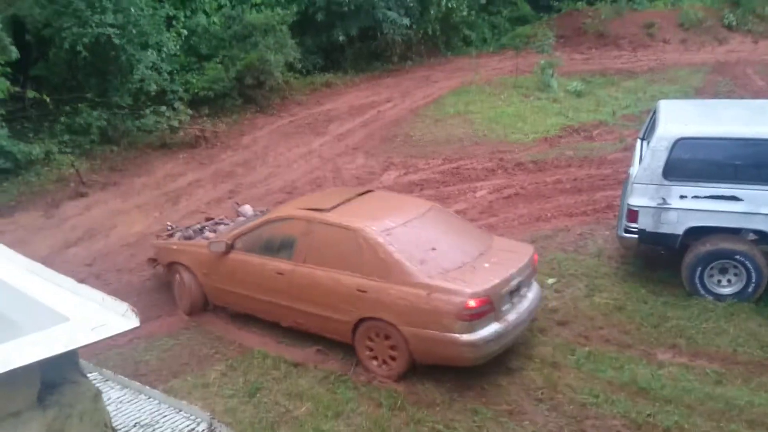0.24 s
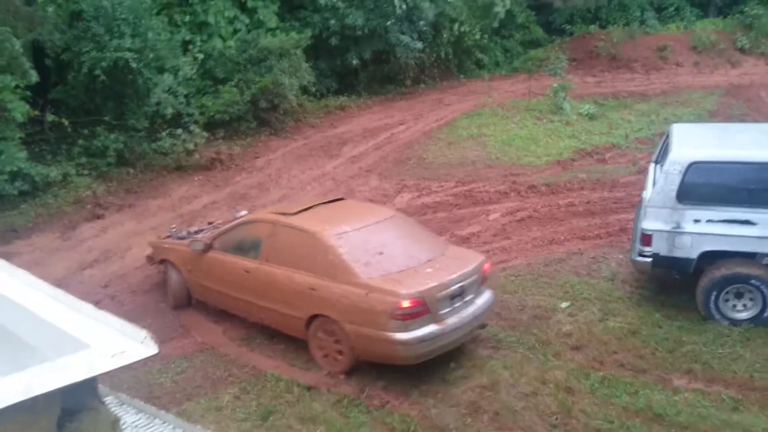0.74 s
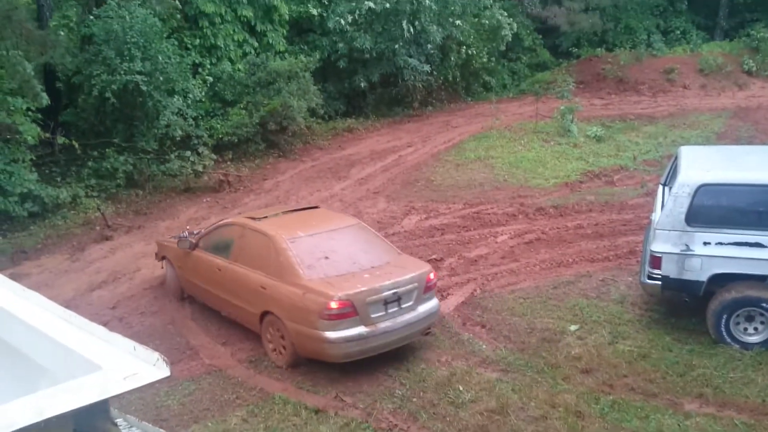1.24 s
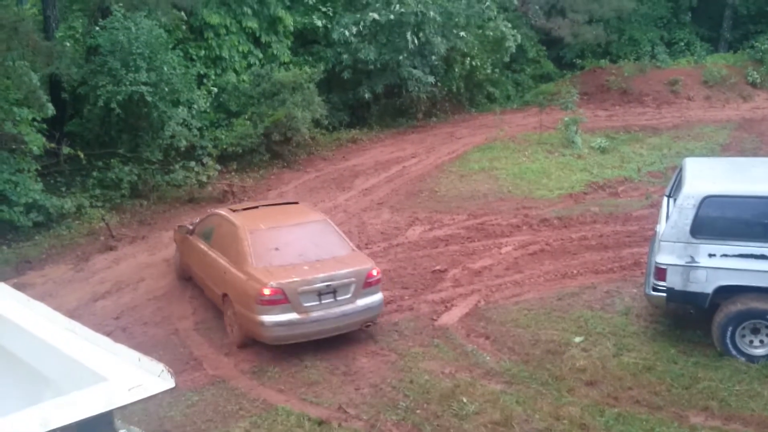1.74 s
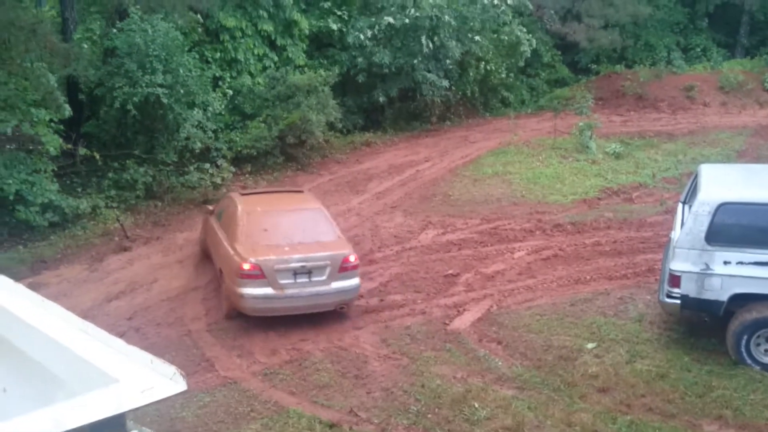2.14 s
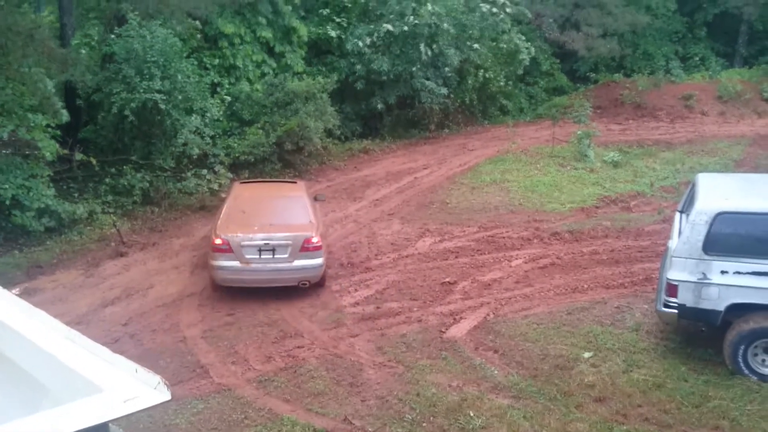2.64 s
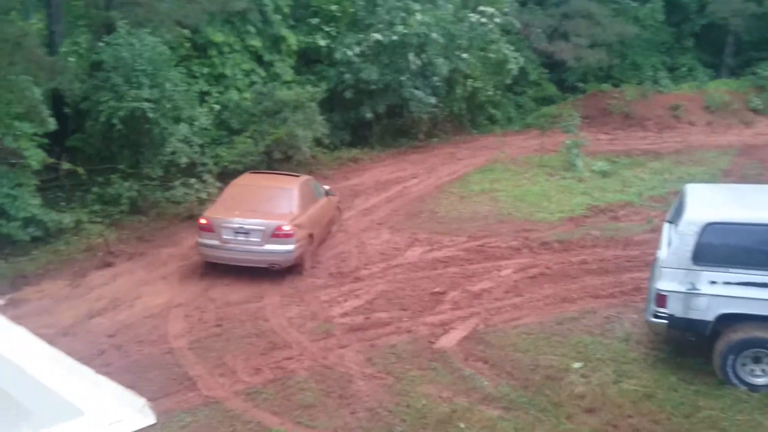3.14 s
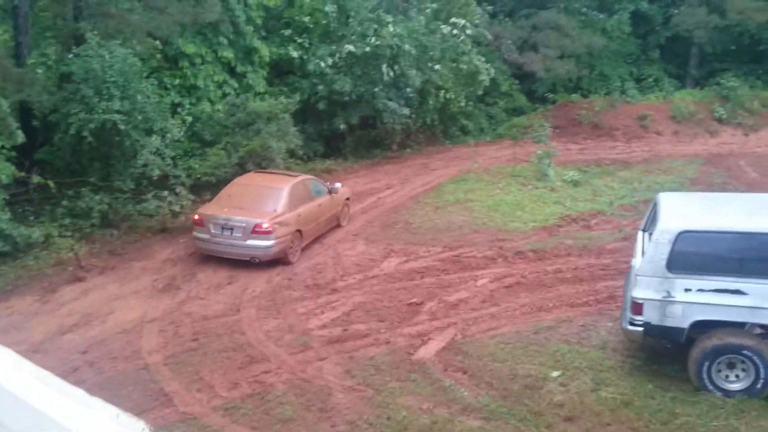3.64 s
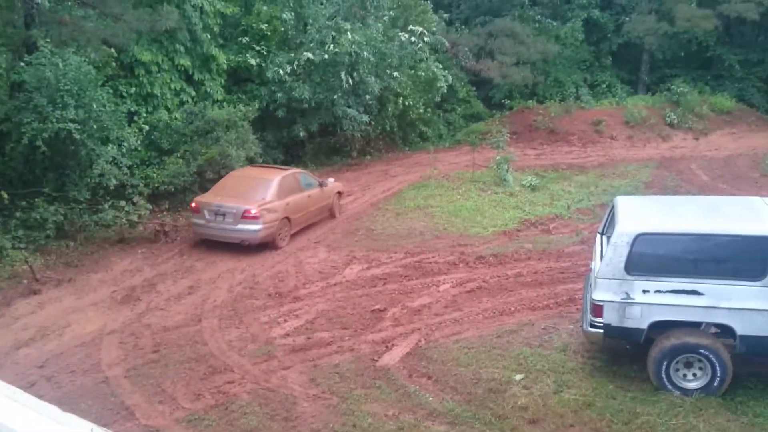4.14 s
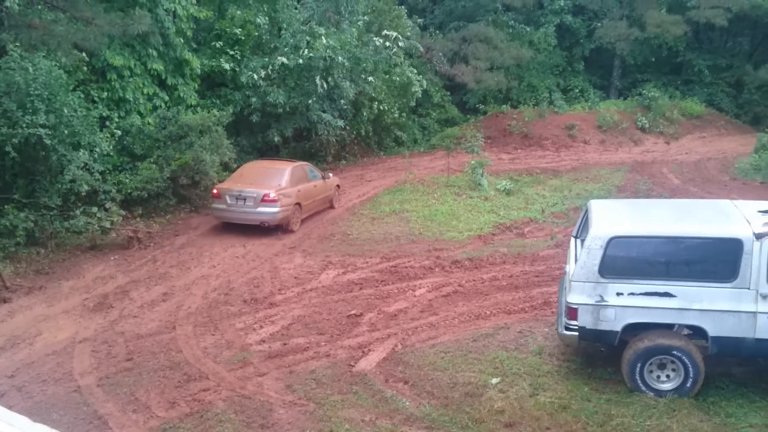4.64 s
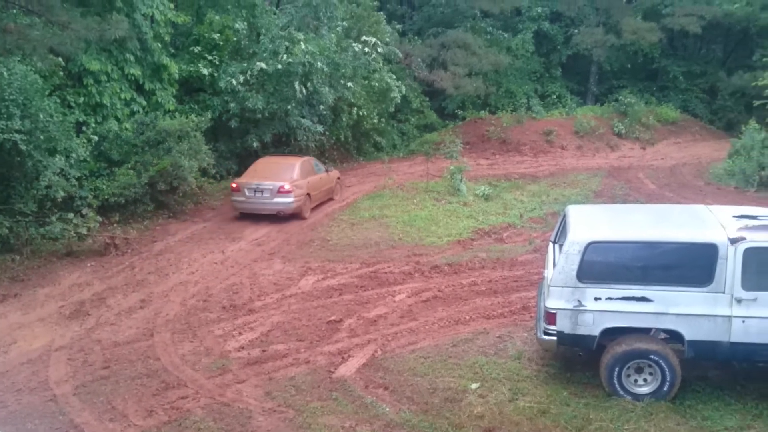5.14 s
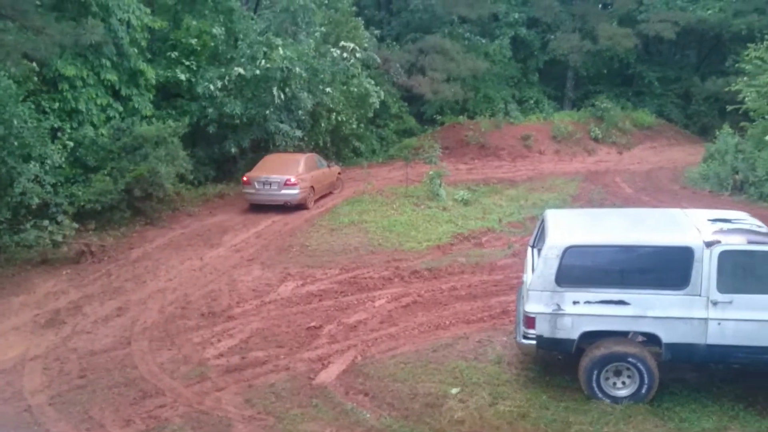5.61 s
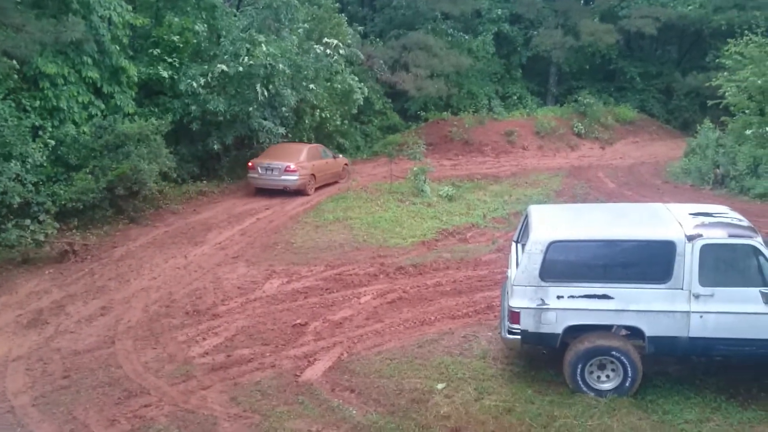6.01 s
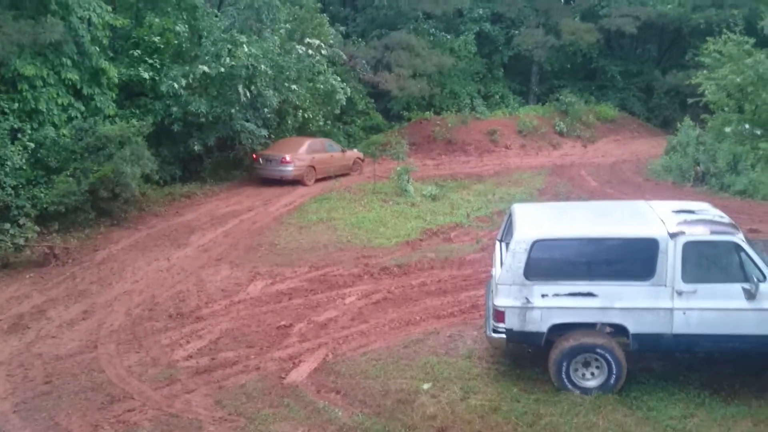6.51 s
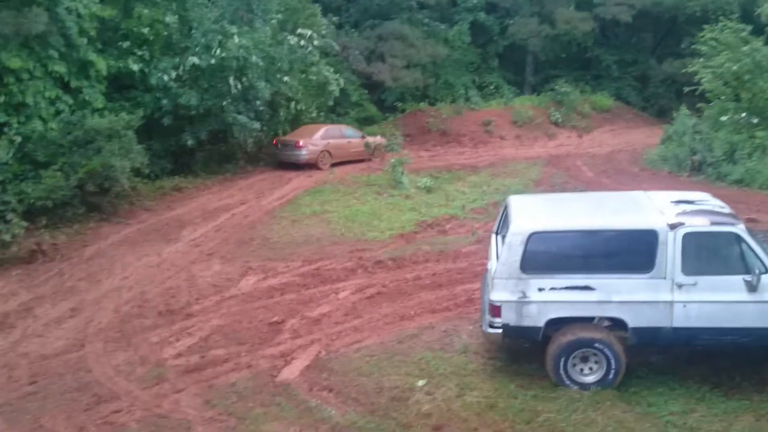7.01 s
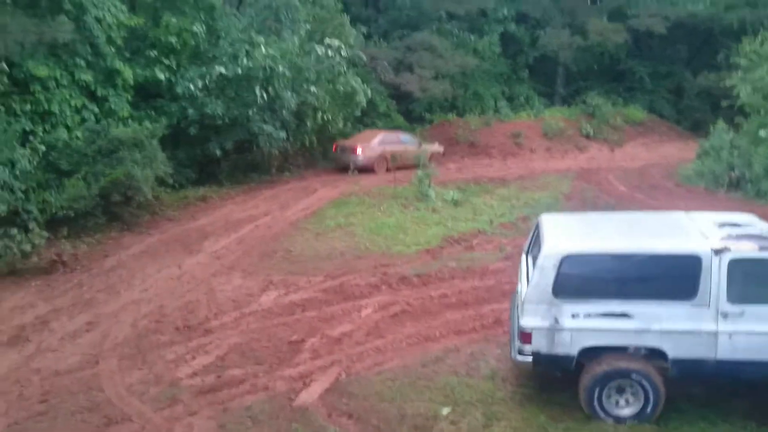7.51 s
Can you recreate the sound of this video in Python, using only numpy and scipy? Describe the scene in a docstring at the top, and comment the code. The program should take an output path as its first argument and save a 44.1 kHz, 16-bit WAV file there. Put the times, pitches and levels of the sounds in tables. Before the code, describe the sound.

Wet spray hisses and mud splatters from slipping tyres while a car engine drones low and fades into the distance.

```python
"""A car pulls away through deep wet mud

Heard from a porch above, spinning front tyres whistle, churn slush and fling hissing spray, and gobs
of mud slap the wheel wells. A four-cylinder engine drones beneath, with a whining pulley and a humming
fan. After two seconds the car turns its tail to the listener and recedes. At the far bend its driveline
(the parts that turn the wheels) sings and runs down, and a hand softly knocks the microphone."""
import sys
import numpy as np
from scipy import signal
from scipy.fft import rfft, irfft, next_fast_len
from scipy.io import wavfile
from scipy.ndimage import uniform_filter1d, map_coordinates

SR = 44100
rng = np.random.default_rng(int(sys.argv[2]) if len(sys.argv) > 2 else 0)


def wrap_up_sound(samples):
    """Save the sound to the file named by the first command line argument, as 16-bit audio."""
    columns = np.atleast_2d(samples).T
    # keep every value between -1 and 1, then stretch to whole-number steps
    tamed = np.clip(columns, -1, 1)
    steps = np.round(tamed * 32767).astype(np.int16)
    wavfile.write(sys.argv[1], SR, steps)


N = 342417
T = np.arange(N) / SR
FFT_SIZE = next_fast_len(N + 8192)
HZ = np.fft.rfftfreq(FFT_SIZE, 1 / SR)

START_M, SPEED_M_PER_S = 11.4, 6.4  # how far off the car starts and how fast it drives
TURN_S, TURN_LENGTH_S = 2.18, 0.74  # middle and length of the turn that shows its tail
BEND_S, BEND_LENGTH_S = 7.31, 0.47  # the same for the far bend
SING_S, SING_ATTACK_S = 5.9, 0.3  # when the driveline starts to sing and how long it takes to swell


def amp(db):
    """Turn decibels into a gain to multiply by."""
    return 10 ** (np.asarray(db) / 20)


def unit(x):
    """Scale a signal to an average (rms) level of 1."""
    return x / np.sqrt(np.mean(x ** 2) + 1e-20)


def over_frequency(rows):
    """Spread each column after the frequency into a curve on the HZ grid, along a log axis."""
    hz, *columns = np.transpose(rows)
    return [np.interp(np.log(HZ + 1), np.log(hz + 1), column) for column in columns]


def over_time(rows):
    """Spread each column after the time into one value per sample."""
    times, *columns = np.transpose(rows)
    return [np.interp(T, times, column) for column in columns]


def wobble(rate):
    """A smooth random curve that passes through `rate` random values a second."""
    coarse = T[::32]
    values = rng.standard_normal(int(N * rate / SR) + 4)
    return np.interp(T, coarse, map_coordinates(values, [coarse * rate]))


def angle(hz):
    """The running phase of a changing pitch, in radians."""
    return 2 * np.pi * np.cumsum(hz) / SR


def ramp(middle, length):
    """A smooth change from 0 to 1."""
    return .5 + .5 * np.sin(np.pi * np.clip((T - middle) / length, -.5, .5))


def hump(middle, half_length):
    """A smooth rise to 1 and back."""
    return np.exp(-((T - middle) / half_length) ** 2)


def swell(start, length):
    """The outline of a burst that rises quickly and drains off."""
    outline = np.zeros(N)
    live = (T > start) & (T < start + 5 * length)
    age = (T[live] - start) / (.45 * length)  # 1 at the peak
    outline[live] = (age * np.exp(1 - age)) ** 2
    return outline


def filtered(x, response):
    """Apply one gain per frequency of the HZ grid."""
    return irfft(rfft(x, FFT_SIZE) * response, FFT_SIZE)[..., :N]


def shaped_noise(colour):
    """Noise of level 1 whose tone follows rows of (frequency [Hz], level [dB])."""
    return unit(filtered(rng.standard_normal(N), amp(over_frequency(colour)[0])))


def stereo_spectrum(direct, scattered, ports):
    """Direct sound differs in level and phase at two microphone ports; trees add unrelated scatter."""
    balance_db, lead, likeness = over_frequency(ports)
    likeness = np.clip(likeness, 0, .995)
    sides = np.array([[.5], [-.5]])
    straight = rfft(direct, FFT_SIZE) * np.sqrt(likeness) * np.exp(1j * sides * lead)
    scatter = rfft(scattered, FFT_SIZE) * np.sqrt(1 - likeness)
    return (straight + scatter) * amp(sides * balance_db)


def distance():
    """Metres to the car, which sets off across the view and then heads more and more away."""
    return np.hypot(START_M, SPEED_M_PER_S * T)


def distance_db():
    """Sound thins out as it spreads: the level change since the start."""
    return 20 * np.log10(START_M / distance())


def shade_db():
    """The car's body blocks sound from its front as the nose swings away; the bend blocks a bit more."""
    return -6.5 * ramp(1, 0.46) - 0.5 * ramp(BEND_S, BEND_LENGTH_S)


def spin_db():
    """How hard the wheels spin, in dB above or below a typical spin."""
    # wheelspin, told by the spray it throws: (time [s], level [dB])
    wheelspin = [(0.0, -44), (0.24, -36.5), (0.76, -35.5), (1.03, -37), (1.2, -36), (2.02, -38.5),
                 (2.12, -42.5), (2.32, -44.5), (2.98, -38.5), (3.22, -33.5), (4.19, -37), (4.75, -37.5),
                 (5.25, -33), (5.68, -36), (6.61, -44), (7.09, -40.5), (7.52, -50), (7.76, -54)]
    typical_db = -36
    return over_time(wheelspin)[0] - typical_db


def engine():
    """Slightly uneven firing makes a drone with overtones; a belt-driven pulley whines and a fan hums."""
    # the firing tone, set by the driver's foot: (time [s], firing rate [Hz], level [dB])
    firing = [(0, 63.5, -33), (0.4, 77.36, -27.5), (0.72, 83.8, -29), (0.88, 86.3, -40), (1.11, 84.4, -38),
              (1.26, 73.2, -31), (1.5, 71.7, -36.5), (2.02, 76.2, -38), (2.4, 70.2, -37), (2.77, 65.7, -40),
              (3.1, 67.3, -37), (3.55, 71, -33.5), (3.95, 73.45, -39), (4.3, 74.9, -33.5), (4.7, 81.6, -42),
              (5.1, 88.5, -31), (5.5, 84.9, -32), (5.95, 73.55, -43.5), (6.55, 65.7, -43.5), (7, 66, -47),
              (7.4, 52.2, -60)]
    # further engine tones: (multiple of the firing rate [x], level against the unfaded octave [dB])
    overtones = [(.5, -14), (1.5, -13), (3, -10), (3.5, -26), (4, -13), (5, -29), (6, -13.5)]
    firing_hz, firing_db = over_time(firing)
    away, shade = ramp(TURN_S, TURN_LENGTH_S), shade_db()
    overtone_db = -41 + 0.87 * distance_db() + 0.29 * (firing_db - firing_db.mean())
    overtone_db -= 6 * hump(.95, .17)  # the overtones dip briefly near one second
    overtone_db -= 6 * ramp(BEND_S, BEND_LENGTH_S)  # the revs drop
    # the second and third harmonics fade while the second is near 181 Hz
    faded_db = overtone_db - 17 / (1 + ((2 * firing_hz - 181) / 6.1) ** 4)

    phase = angle(firing_hz * (1 + 0.003 * wobble(25)))
    drone = amp(firing_db + .9 * wobble(7) + 1.1 * wobble(28)) * np.sin(phase + .15 * wobble(30))
    octave = np.sin(2 * phase + (.15 + .6 * away) * wobble(36))  # sputters more after the turn
    drone += amp(faded_db + 1.4 * wobble(9) + 1.1 * wobble(32)) * octave
    drone += amp(faded_db - 9 + wobble(9)) * away * np.sin(3 * phase)  # the tailpipe faces the porch
    for multiple, db in overtones:
        gain = amp(overtone_db + db + shade + 4.3 * wobble(23))
        drone += gain * np.sin(multiple * phase + wobble(27))
    return np.sqrt(2) * (drone + pulley(firing_hz, phase) + fan())


def pulley(firing_hz, firing_phase):
    """The belt ties the pulley to the engine, so its whine gets higher and louder with the revs."""
    level_db = -50 + 0.89 * shade_db() + 0.27 * (firing_hz - firing_hz.mean())
    level_db += 3 * ramp(TURN_S, TURN_LENGTH_S)  # carries better once the car has turned
    level_db -= 6 * ramp(SING_S, SING_ATTACK_S)  # the revs drop
    return amp(level_db + 3 * wobble(16)) * np.sin(9.03 * firing_phase + .45 * wobble(45))


def fan(pitch_hz=259):
    """The electric fan's blades hum at a nearly steady pitch, with a faint octave above."""
    phase = angle(pitch_hz + 0.68 * wobble(5.38))
    level_db = -43 + shade_db() + 0.99 * distance_db() + 1.6 * wobble(12)
    return amp(level_db) * (np.sin(phase) + amp(-15) * np.sin(2 * phase))


def fuzzy_tone(hz, width_hz):
    """Rubbing makes things ring unevenly: a narrow band of noise around one pitch."""
    phase = angle(hz + np.zeros(N))
    return wobble(width_hz) * np.sin(phase) + wobble(width_hz) * np.cos(phase)


def tyre_whistle():
    """The slipping tyre rings at two close pitches, which sink and fade as it finds grip."""
    # the lower of the two tones: (time [s], pitch [Hz], level [dB])
    whistle = [(0, 2120, -50), (.2, 2090, -42), (.65, 2040, -44), (.95, 1950, -34.5), (1.2, 1940, -41),
               (1.45, 1910, -48), (1.7, 1900, -80)]
    hz, db = over_time(whistle)
    upper = amp(-5) * fuzzy_tone(1.06 * hz, width_hz=90)
    return amp(db) * (fuzzy_tone(hz, width_hz=90) + upper)


def rumble():
    """Tyres ploughing the ruts and swirling exhaust gas make a low, restless noise."""
    # tone of the rumble: (frequency [Hz], level [dB])
    colour = [(20, -21), (42, -15), (110, -4.5), (220, -1), (380, -6.5), (520, -11), (900, -28)]
    level_db = -45 + 0.42 * distance_db() + 0.44 * spin_db() + 0.12 * shade_db()
    return shaped_noise(colour) * amp(level_db + 3.5 * wobble(22))


def droplets(per_second, spread_db, wash):
    """Countless impacts of very unequal size on a wash of finer ones, in three unrelated streams."""
    hits = (rng.random((3, N)) < per_second / SR) * rng.choice([-1, 1], (3, N))
    size = amp(spread_db * np.minimum(rng.exponential(size=(3, N)), 3.8))
    return unit(hits * size) + wash * rng.standard_normal((3, N))


def resonate(x, peaks, tuning, ripple_db):
    """Resonances slide as the car moves and grow with wheelspin; ground and wall echoes add a ripple."""
    hz, times, spectrum = signal.stft(x, SR, nperseg=1024)
    untuned_hz = hz[:, None] / np.interp(times, T, tuning)
    strength = np.maximum(1 + 0.096 * np.interp(times, T, spin_db()), 0)
    peaks_db = sum(db / (1 + ((untuned_hz - centre) / (width / 2)) ** 4) for centre, width, db in peaks)
    ripple = rng.standard_normal(spectrum.shape[1:])
    for _ in range(2):  # smooth over frequency, then over time
        ripple = uniform_filter1d(ripple, size=4, axis=0)
        ripple = uniform_filter1d(ripple, size=12, axis=1)
    gain = amp(peaks_db * strength + ripple_db * unit(ripple))
    return signal.istft(spectrum * gain, SR, nperseg=1024)[1][:, :N]


def mud_bands(colour, ports, peaks, tuning):
    """Flying mud from one direction as four equally strong stereo bands: churn, slush, spray, mist."""
    drops = droplets(per_second=2600, spread_db=3.5, wash=1.4)
    drops = resonate(drops, peaks, tuning, ripple_db=1.8)
    spectrum = stereo_spectrum(drops[0], drops[1:], ports) * amp(over_frequency(colour)[0])
    below_edges = [1 / (1 + (HZ / edge_hz) ** 12) for edge_hz in (1250, 3000, 8000)]
    between_edges = np.diff(below_edges, axis=0, prepend=0, append=1)
    bands = [irfft(spectrum * response, FFT_SIZE)[:, :N] for response in between_edges]
    return np.array([band / (np.std(band.mean(0)) + 1e-12) for band in bands])


def mud():
    """Spinning wheels throw mud in uneven clumps; its tone changes as the car turns away."""
    # tone of the mud, with the car side-on and driving away: (frequency [Hz], level [dB])
    colour_side = [(150, -40), (330, -26), (480, -12), (720, -10), (1150, -5.5), (1700, 6.5), (2050, 6.5),
                   (2900, -2.5), (4200, -13), (5600, -7), (6400, -1), (8300, -9), (11500, -10),
                   (14200, -18.5), (15400, -9.5)]
    colour_away = [(150, -44), (330, -30), (480, -12.5), (760, -5), (1080, -3.5), (1450, 1), (1800, 1.5),
                   (2200, 2), (2950, -7), (3550, -5), (4400, -10.5), (5600, -6), (6500, -2.5), (7400, -9),
                   (10000, -11.5), (13500, -22), (15400, -16.5)]
    # how those two directions reach the microphone ports:
    # (frequency [Hz], left over right [dB], left lead [radians], likeness of the sides [0-1])
    ports_side = [(100, -4.5, 4.3, 1), (724, -3, 2.98, 0.98), (1220, -6.6, 3, 0.65), (2070, -4, 5.1, 0.06),
                  (3000, 0.5, 7.7, 0.6), (3280, -1.5, 2.9, 0.33), (4200, -6.5, 5.9, 0.02),
                  (5550, -9.5, 8.4, 0.77), (6170, 0, 8.5, 0.84), (7650, 11.5, 9.6, 0.3),
                  (8700, -10, 16.4, 0.8), (8900, -2.5, 17.2, 0.7), (11540, 6, 16.7, 0.5),
                  (12700, -2, 33, 0.2), (14000, -4, 11.6, 1), (15500, 6, 14.45, 0.8)]
    ports_away = [(107, -7.5, 2.9, 1), (796, -2.5, 3.44, 0.94), (1240, -4, 4.02, 0.78),
                  (1550, -4.5, 4.12, 0.81), (2320, -2.5, 4.07, 0.73), (2940, -0.5, 4.9, 0.97),
                  (3700, -1.5, 3.25, 0.27), (4200, -3, 4.06, 0.2), (5180, -7, 4.39, 0.91),
                  (6180, -3, 6.5, 0.62), (6490, 6.5, 9.8, 0.077), (7500, -2.5, 7.9, 0.33),
                  (10200, 4.5, 3.8, 0.08), (12500, -3, 5.7, 0.98), (13300, 16, 14, 0.87),
                  (15200, -5, 4.6, 0.29)]
    # resonances of the wheel wells and porch: (frequency [Hz], width [Hz], boost [dB])
    peaks_side = [(950, 220, 0.5), (2000, 300, 1.5), (2680, 230, 2.5), (3780, 200, 3.5), (4610, 500, 4),
                  (5530, 510, 3.5), (5850, 180, 7), (7580, 170, 2.5), (8250, 400, 2)]
    peaks_away = [(740, 200, 5), (1500, 210, 1.2), (2230, 560, 3.5), (2970, 260, 3.3), (4100, 350, 2.2),
                  (5000, 190, 4.2), (5590, 360, 4), (6210, 370, 3.2), (6536, 88, 7.7), (8700, 800, 1)]
    # deep ruts where slush wells up: (middle [s], half length [s], rise [dB])
    ruts = [(1.084, 0.48, 6.5), (1.94, 0.23, 4), (2.5, 0.27, 2.5), (3.754, 0.39, 4.5), (5.627, 0.25, 3.5),
            (6.303, 0.28, 0.5), (7.175, 0.39, 6)]
    from_side = mud_bands(colour_side, ports_side, peaks_side, tuning=1.026 - 0.05 * T)
    from_behind = mud_bands(colour_away, ports_away, peaks_away, tuning=1.03 - 0.0113 * T)
    away = ramp(TURN_S, TURN_LENGTH_S)
    churn, slush, spray, mist = np.sqrt(1 - away) * from_side + np.sqrt(away) * from_behind

    # the low churn hardly grows with wheelspin; the fine mist grows fastest
    spin = spin_db()
    rut_db = sum(db * hump(middle, half_length) for middle, half_length, db in ruts)
    churn_db = -50 + 0.22 * spin + 0.99 * rut_db + 0.64 * shade_db()
    slush_db = -45.5 + 0.5 * spin + rut_db
    spray_db = -36.5 + spin
    mist_db = -40.5 + 1.32 * spin - 13 * ramp(BEND_S, BEND_LENGTH_S)
    mist_db += 4 * hump(1.58, 0.59)  # flung towards the porch as the car swings round
    mist_db -= 0.08 * (distance() - START_M)  # soaked up by the air

    slap, splash, puff = gobs()
    clumps_db = .25 * wobble(22) + .35 * wobble(90)
    # hypot adds the power of the gobs to that of the running stream
    return (churn * np.hypot(amp(churn_db + clumps_db + 0.68 * wobble(45)), amp(-10) * slap)
            + slush * np.hypot(amp(slush_db + clumps_db + 0.94 * wobble(45)), slap)
            + spray * np.hypot(amp(spray_db + clumps_db + 0.63 * wobble(45)), splash)
            + mist * np.hypot(amp(mist_db + clumps_db + 0.74 * wobble(40)), puff))


def gobs():
    """Gobs of mud hit the car: the strength over time of their slaps, splashes and puffs of mist."""
    # one gob a row: (time [s], length [s], slap [dB], splash [dB], mist [dB])
    hits = [(0.212, 0.015, -44, -39, -52), (0.43, 0.012, -42, -50, -50), (0.81, .07, -49, -38, -43),
            (1.438, 0.018, -40, -40, -50), (1.574, 0.012, -38, -35, -40), (1.618, 0.027, -46, -48, -38),
            (1.801, 0.072, -62, -58, -41), (1.832, .016, -42, -41, -45), (1.866, .008, -38, -42, -40),
            (2.07, .038, -39.5, -49, -58), (2.108, .016, -41, -50, -58), (3.21, .018, -41, -45, -46),
            (3.242, .006, -47, -25.5, -48), (3.326, 0.0085, -40, -32, -47), (3.475, .06, -50, -34.5, -44),
            (3.533, .022, -41, -34, -41), (3.563, .026, -41, -33.5, -38), (3.636, .03, -36, -31.5, -38),
            (3.672, .04, -34.5, -39, -44), (3.703, .022, -39, -31.5, -38), (3.738, .016, -38, -34, -33),
            (3.778, .04, -39.5, -49, -50), (5.243, .034, -44, -29, -47), (5.82, .035, -51, -37, -48)]
    return sum(np.outer(amp(levels_db), swell(start, length)) for start, length, *levels_db in hits)


def thuds():
    """Short, dull pushes of air, only a cycle or two long."""
    # low thuds: (time [s], pitch [Hz], level [dB])
    pushes = [(0.396, 151, -19), (4.321, 70, -28)]
    return sum(amp(db) * swell(start, 1 / hz) * np.sin(2 * np.pi * hz * (T - start))
               for start, hz, db in pushes)


def rasps():
    """Wet rubber slips and squeezes out mud unevenly, so each rasp is a fuzzy band around its pitch."""
    # rasps and squelches: (time [s], length [s], pitch [Hz], width [Hz], level [dB])
    slips = [(0.76, 0.1, 2604, 160, -37), (1.1, .4, 1720, 360, -36.5), (1.12, .3, 1490, 100, -37),
             (1.744, 0.022, 2326, 598, -31), (1.83, .021, 2450, 800, -26), (1.866, .009, 2400, 900, -29),
             (2.066, .035, 1900, 300, -28.5), (3.097, 0.56, 2240, 200, -40), (3.242, .006, 6200, 1400, -21),
             (3.612, .09, 2230, 240, -29), (3.665, .04, 1400, 350, -33), (3.695, .028, 3900, 800, -28.5),
             (6.98, 0.17, 1480, 100, -34), (7.012, 0.25, 2230, 303, -40), (6.759, 0.61, 1830, 166, -46.5)]
    return sum(amp(db) * swell(start, length) * fuzzy_tone(hz, width_hz)
               for start, length, hz, width_hz, db in slips)


def driveline():
    """A rough, fitful whine under load; it dies when the driver lifts off, and one low tone runs down."""
    # tones of the whine: (multiple of the base pitch [x], level [dB])
    harmonics = [(2, -9), (3, -1.5), (4, -0.5), (5, -23), (6, -22)]
    base_hz, lift_off_s = 365.5, 7.03
    fall_hz_per_s, fade_db_per_s = 580, 74
    coasting_s = np.maximum(T - lift_off_s, 0)
    last_surge_db = 6 * hump(lift_off_s, .08)
    sing_db = -48.5 + last_surge_db - fade_db_per_s * coasting_s
    loaded_phase = angle(base_hz * (1 + .008 * wobble(40)))
    falling_phase = angle(np.maximum(base_hz - fall_hz_per_s * coasting_s, 0))
    sound = amp(-44 + 2 * wobble(30)) * hump(7.2, 0.125) * np.sin(falling_phase)
    for multiple, db in harmonics:
        gain = amp(sing_db + db + 2.8 * wobble(22))  # it catches and lets go
        sound += gain * np.sin(multiple * loaded_phase + 1.2 * wobble(130))
    fade_in = np.clip((T - SING_S) / SING_ATTACK_S, 0, 1)
    return np.sqrt(2) * sound * fade_in


def hand_knocks():
    """A hand's knocks travel through the microphone's case and reach both channels alike."""
    # soft knocks and rubs: (time [s], length [s], level [dB])
    knocks = [(6.958, 0.043, -54.5), (7.022, 0.14, -55.5), (7.27, 0.21, -71), (7.492, 0.026, -52),
              (7.513, 0.03, -56), (7.585, .03, -59), (7.611, 0.023, -58)]
    # their dull tone: (frequency [Hz], level [dB])
    colour = [(20, -13), (75, -4), (160, -7), (420, -5), (600, -14), (1200, -50)]
    return shaped_noise(colour) * sum(amp(db) * swell(start, length) for start, length, db in knocks)


def scene():
    """The car's own sounds share one path to the listener; the mud brings its own stereo spread."""
    # how the car reaches the microphone ports:
    # (frequency [Hz], left over right [dB], left lead [radians], likeness of the sides [0-1])
    ports = [(40, 1.5, 2.85, 0.3), (76.6, 0.6, 3.032, 0.84), (143, -0.4, 2.88, 0.99), (180, 0, 3.12, .995),
             (291, -0.5, 3.06, 0.98), (462, -2, 3.45, 0.98), (760, -3, 2.74, 0.75),
             (1409, -2.5, 4.55, 0.57)]
    car = engine() + driveline() + tyre_whistle() + rasps() + thuds() + rumble()
    scattered = amp(4.5) * np.array([rumble(), rumble()])
    stereo_car = irfft(stereo_spectrum(car, scattered, ports), FFT_SIZE)[:, :N]
    return stereo_car + mud() + hand_knocks()


def record(dry):
    """Cut off the very highest treble."""
    return filtered(dry, HZ < 15800)


dry = scene()
out = record(dry)
wrap_up_sound(out)
```